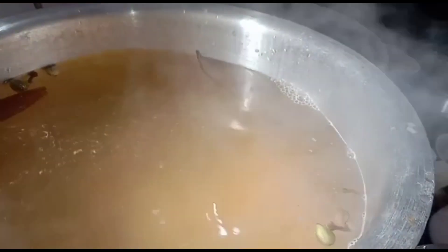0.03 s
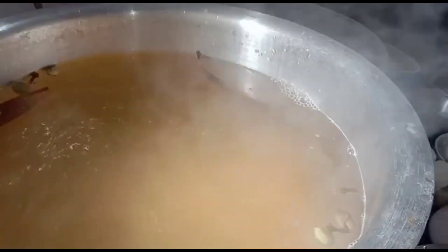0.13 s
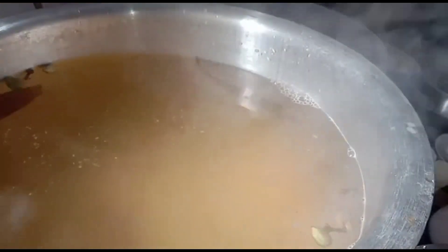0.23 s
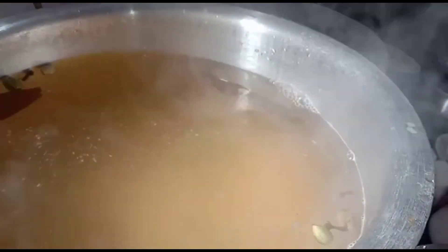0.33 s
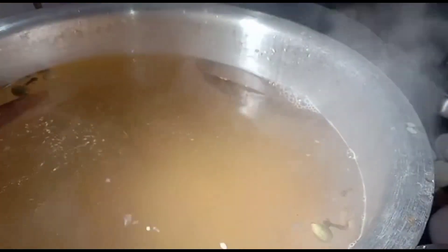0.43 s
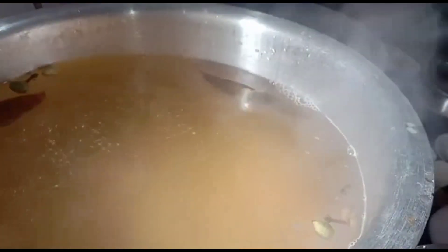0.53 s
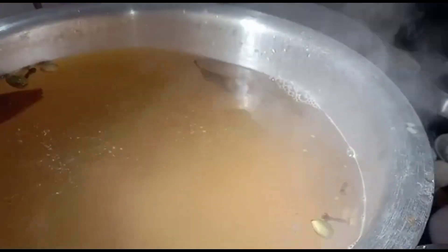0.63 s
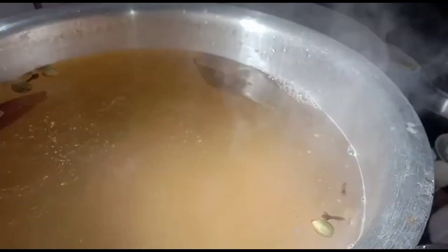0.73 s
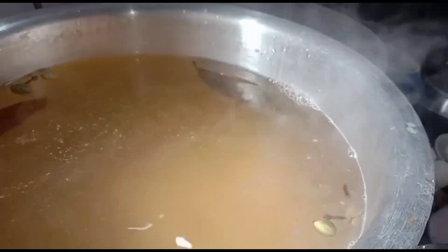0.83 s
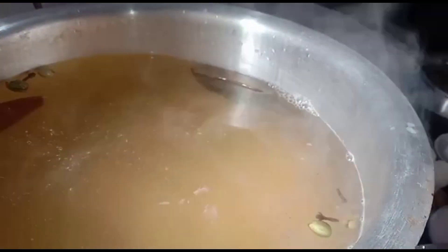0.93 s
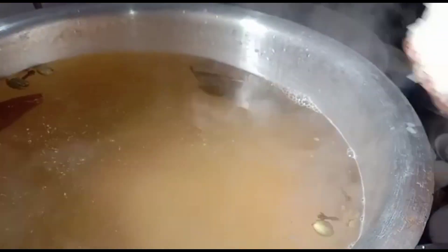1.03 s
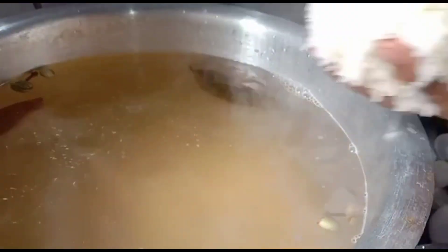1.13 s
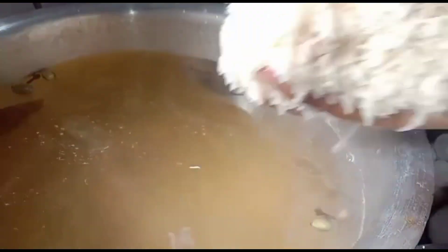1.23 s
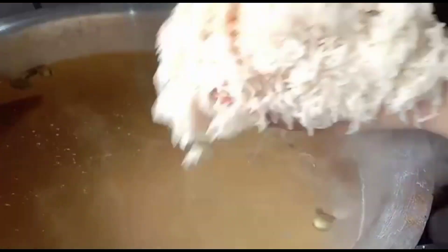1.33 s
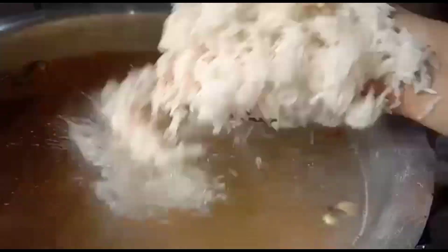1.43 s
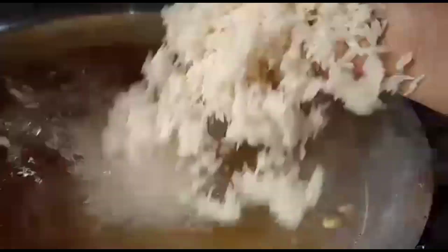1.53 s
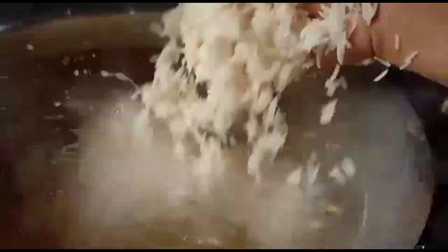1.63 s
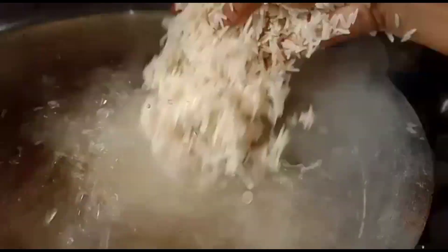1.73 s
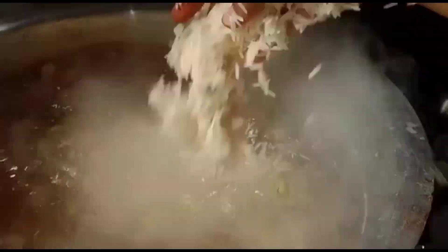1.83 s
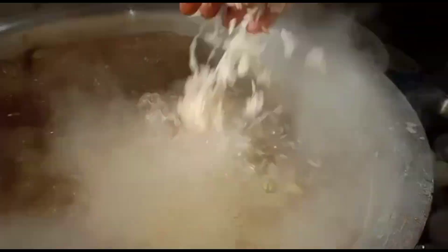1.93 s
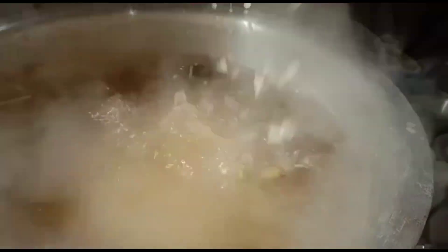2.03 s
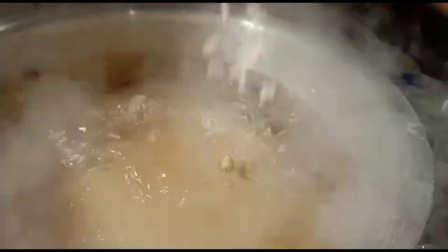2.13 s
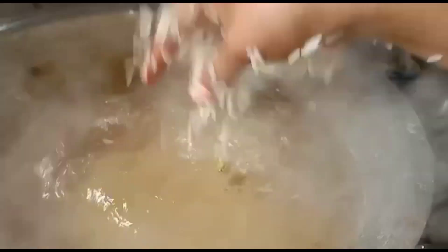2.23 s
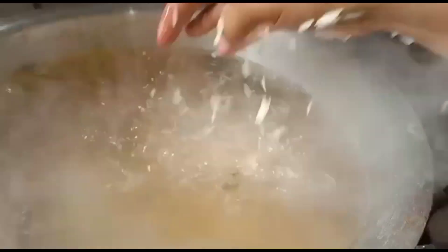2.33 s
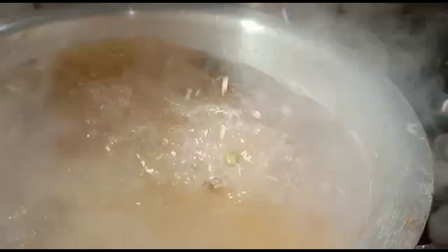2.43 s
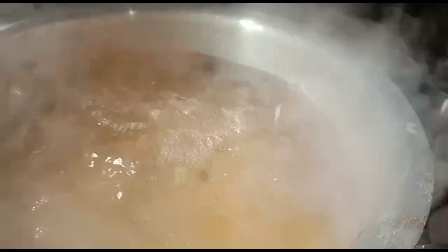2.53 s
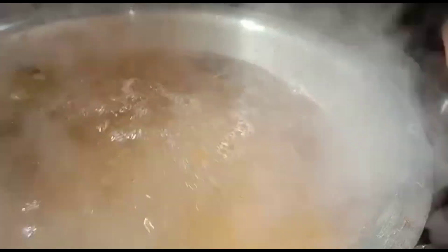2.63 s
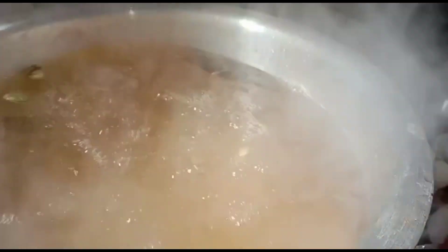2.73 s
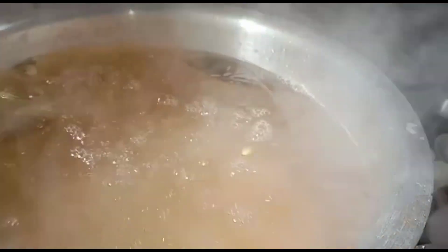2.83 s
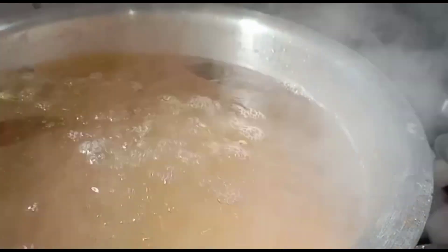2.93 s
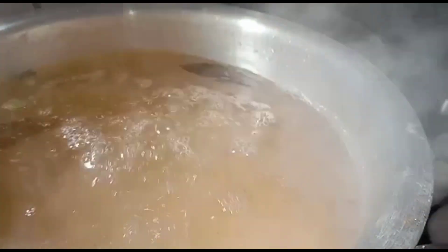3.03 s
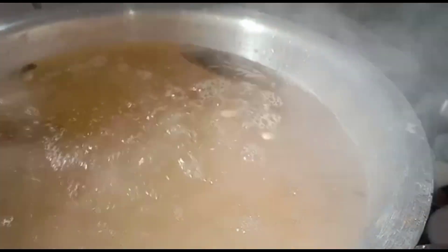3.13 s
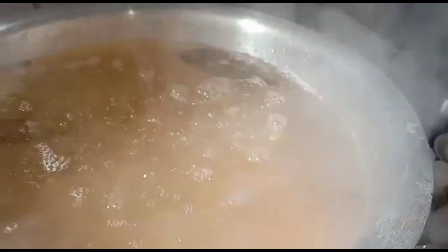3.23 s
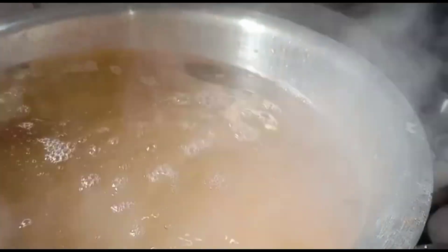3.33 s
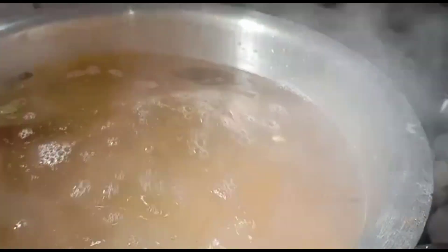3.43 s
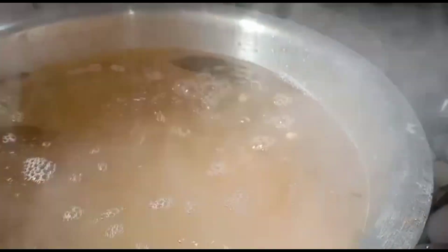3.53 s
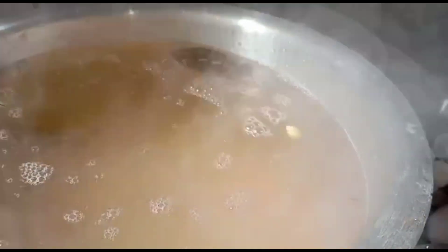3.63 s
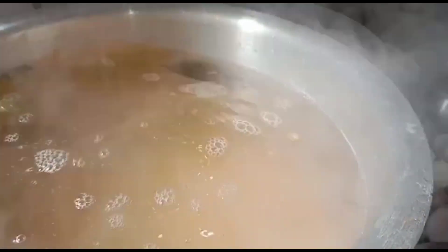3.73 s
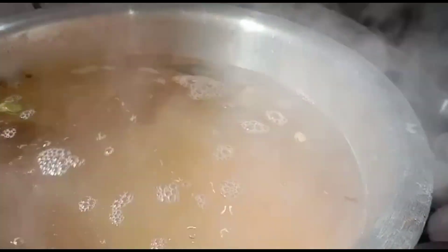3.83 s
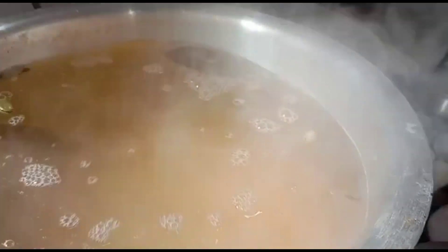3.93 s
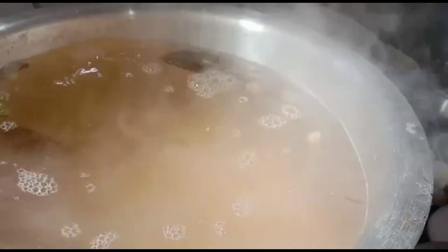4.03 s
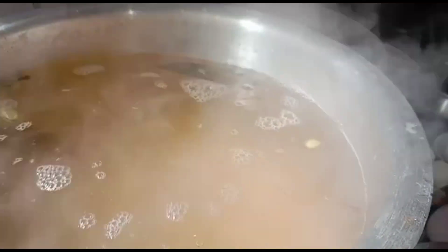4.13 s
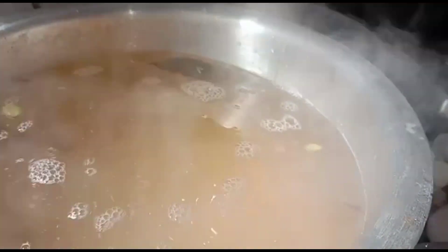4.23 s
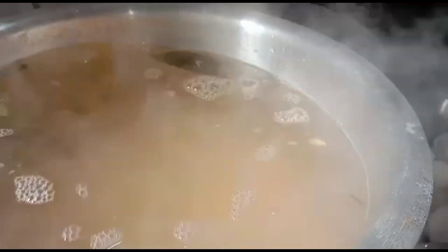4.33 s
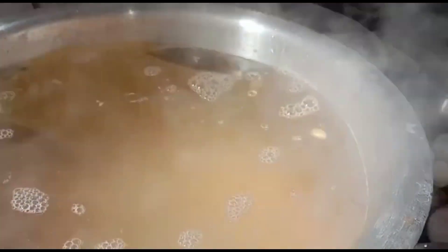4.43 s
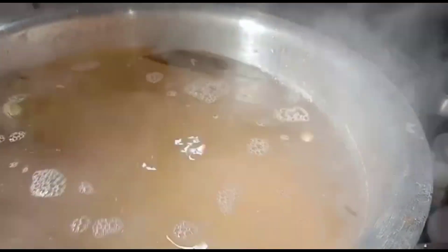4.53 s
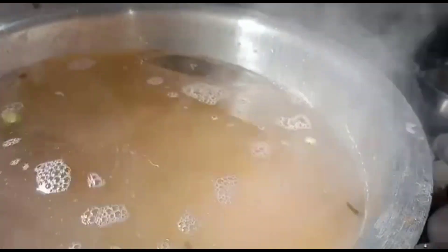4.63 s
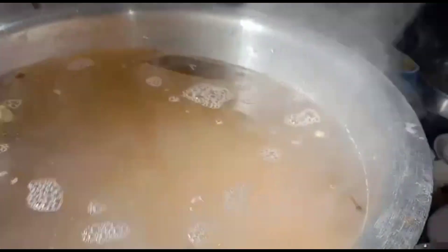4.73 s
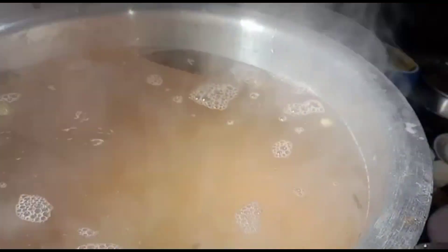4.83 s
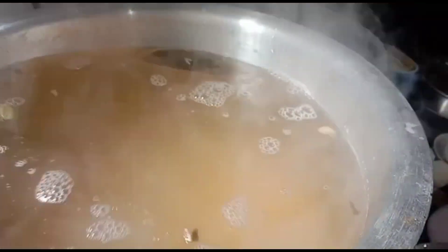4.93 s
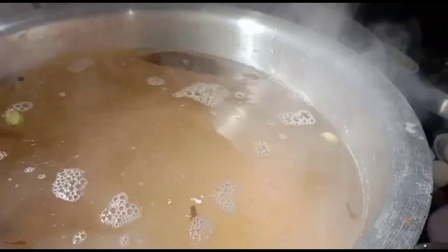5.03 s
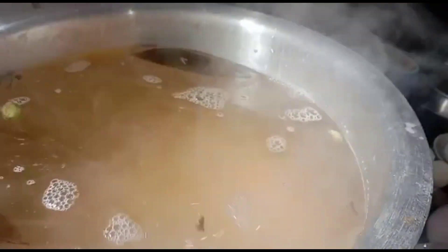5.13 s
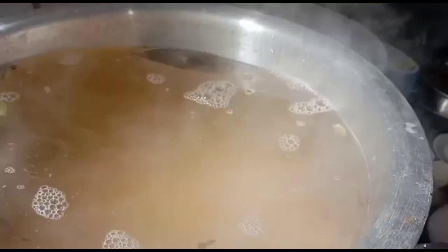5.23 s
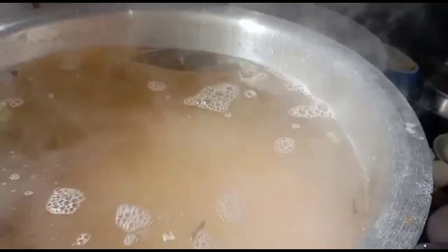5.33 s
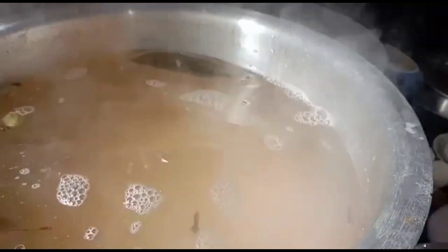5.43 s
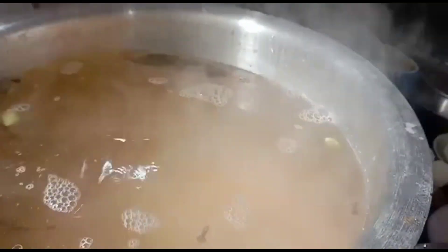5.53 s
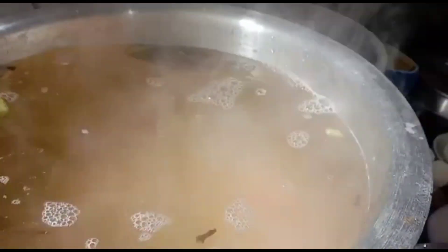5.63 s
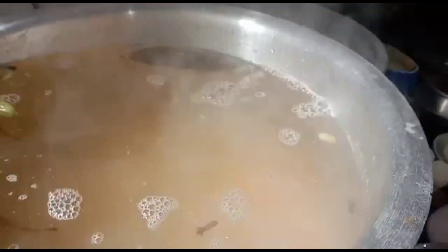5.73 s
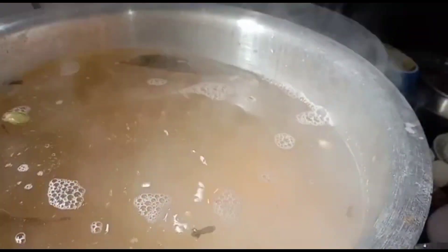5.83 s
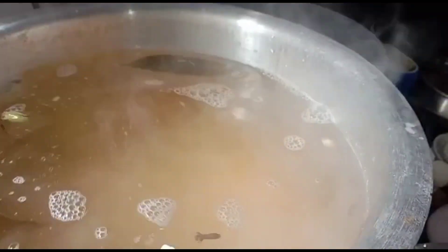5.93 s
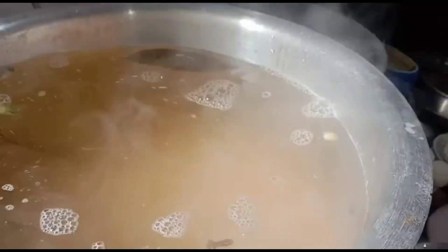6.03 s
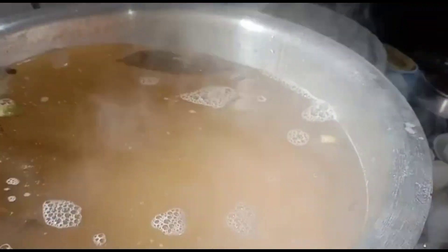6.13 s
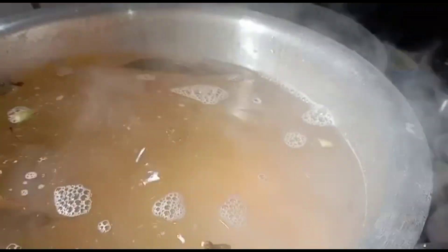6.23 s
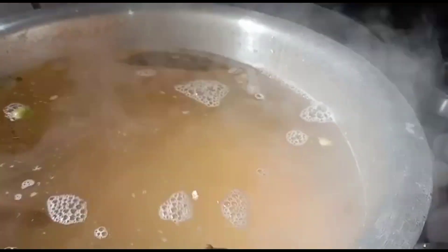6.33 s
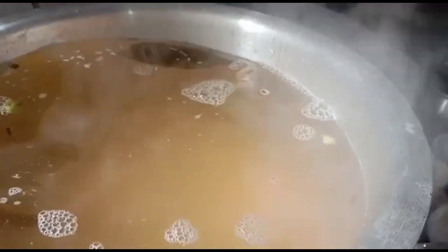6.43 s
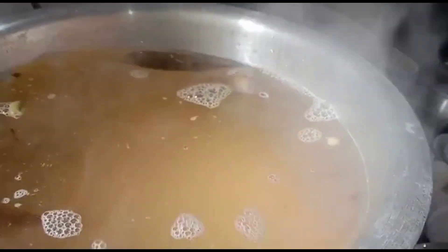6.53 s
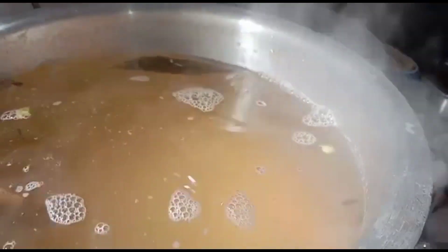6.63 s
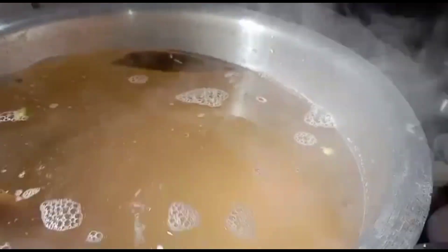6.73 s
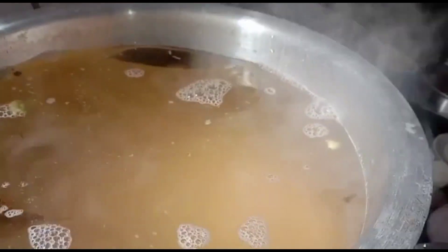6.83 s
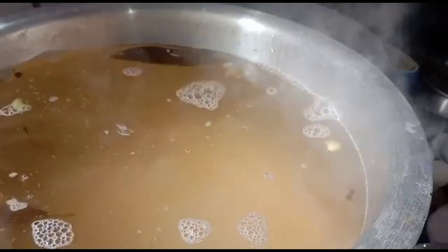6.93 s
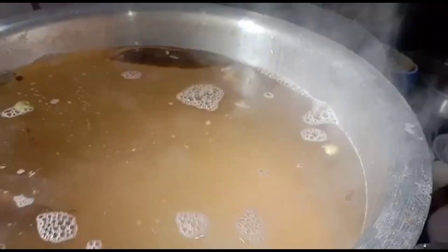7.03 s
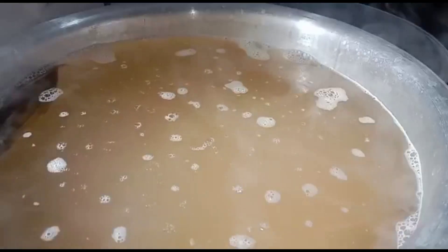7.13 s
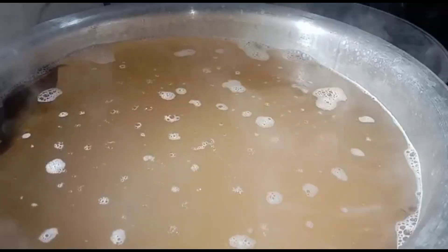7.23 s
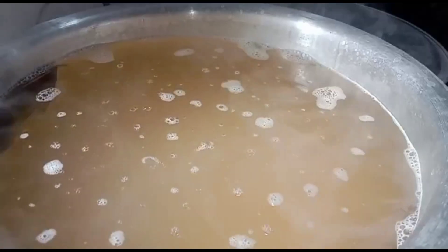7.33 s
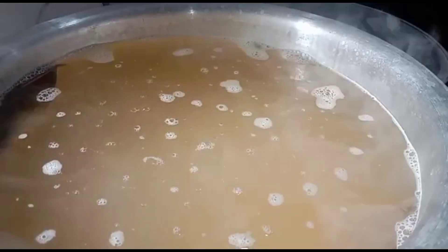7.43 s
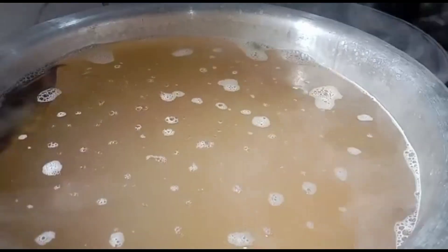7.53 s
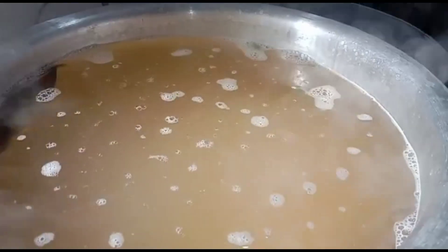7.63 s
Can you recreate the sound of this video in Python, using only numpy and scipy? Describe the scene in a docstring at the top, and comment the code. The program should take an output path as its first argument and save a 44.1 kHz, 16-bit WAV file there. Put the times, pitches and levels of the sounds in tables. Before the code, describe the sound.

A few clear, pitched bubble pops sound in a simmering pot, heard closely with a short metallic kitchen reverberation. Wet grains hit the liquid in rapid slaps and spray, thinning to a last trickle. The pot settles, then a loud snap and low gloop break out, followed by crackling foam, quick little chirping pops and a rolling burble. The end is nearly silent except for low rumble and faint hiss.

```python
"""Rice into simmering stock

Soaked rice slides off a hand into a wide metal pot of simmering stock in a kitchen.
The grains patter and drag air under: swarms of short decaying resonances. Steam bubbles pop singly as chirped
cavity rings with a snap of noise, one bursts loudly with a deep gulp, and the boil wells up in fizzing surges.
The burner rumbles below as coloured noise, behind it lie faint steady bands of high noise."""
import sys
import numpy as np
from scipy import signal
from scipy.fft import rfft, irfft
from scipy.io import wavfile

SR = 44100
rng = np.random.default_rng(int(sys.argv[2]) if len(sys.argv) > 2 else 0)


def pcm_store(signal):
    """Save signal as 16-bit PCM."""
    levels = np.round(np.clip(np.atleast_2d(signal), -1, 1) * 32767)
    wavfile.write(sys.argv[1], SR, levels.astype(np.int16).T)


N = 338247
TIME = np.arange(N) / SR

# Levels of the water sources are nominal: mixing gains, pot and room act on them afterwards.
# Rice entering the water: (time [s], spray level [dB], trapped-air level [dB])
RICE_FLOW = [(1.455, -69, -82), (1.476, -44.5, -70), (1.497, -33, -51.5), (1.55, -40, -51),
             (1.59, -40.5, -64), (1.622, -37.5, -74), (1.634, -28.5, -45.5), (1.672, -28, -40),
             (1.7, -30, -43.5), (1.716, -31, -44.5), (1.782, -34, -40), (1.815, -39, -44.5),
             (1.834, -27, -44), (1.86, -27, -41), (1.9, -36, -49), (1.945, -34, -61), (1.985, -44.5, -64),
             (2.012, -31, -63), (2.062, -33.5, -49), (2.08, -39.5, -39.5), (2.1, -33.5, -33.5),
             (2.18, -52, -69), (2.2, -74, -73), (2.315, -56.5, -59), (2.33, -46, -61), (2.43, -52.5, -68),
             (2.49, -102, -96)]
# Relative spectra of the spray and of the trapped air: (frequency [Hz], level [dB])
SPRAY_SPECTRUM = [(1000, -20.5), (1500, -15.5), (2000, -17), (2700, 5), (4000, -1), (7000, 0.5),
                  (10000, -14), (15500, -1.5)]
TRAPPED_AIR_SPECTRUM = [(250, -2.5), (400, -10), (550, -13.5), (750, -3.5), (1150, -12.5), (1400, 6.5),
                        (2000, -9.5)]

# Pot simmers, is stilled by the rice, boils again: (time [s], small-bubble level [dB], large-bubble level [dB])
BOIL_LEVELS = [(0, -55.5, -75), (0.2, -69.5, -73), (0.75, -74, -63), (0.95, -81, -82), (1.3, -66, -65),
               (2.6, -102, -100), (3.1, -93.5, -84.5), (3.65, -54, -66.5), (4.05, -71, -71),
               (4.5, -51, -72), (4.8, -51.5, -78), (5.0, -51, -64), (5.33, -64, -79), (5.4, -56.5, -76),
               (5.55, -49.5, -58.5), (5.83, -63, -59.5), (6.08, -58.5, -56), (6.3, -51.5, -35),
               (6.53, -53, -39), (6.66, -71, -64.5), (6.8, -59, -58.5), (6.88, -64, -52),
               (7.1, -65.5, -95.5), (7.43, -67.5, -83), (7.67, -69.5, -77.5)]
# Relative spectra of crackle, small bubbles, large bubbles and foam: (frequency [Hz], level [dB])
SIMMER_SPECTRUM = [(900, -10.5), (1400, -3), (1800, -0.5), (3000, 2.5), (4500, -1), (6500, -3.5)]
SMALL_BUBBLE_SPECTRUM = [(1400, -0.5), (1800, -6), (3000, 6), (4500, 1), (6500, -3.5)]
LARGE_BUBBLE_SPECTRUM = [(300, -20), (500, -15.5), (750, -4.5), (1200, 7.5), (1600, 3.5), (2200, -7)]
FOAM_SPECTRUM = [(4500, -10), (5800, -3), (7000, 11.5), (8800, -2.5), (12500, 2.5), (15500, 1.5)]
# foam level at this level of small bubbles; share of their swing in dB that it follows
FOAM_DB, FOAM_AT_FIZZ_DB, FOAM_FOLLOWS = -61.5, -50, 0.78

# Rafts of fine foam that collapse: (time [s], level [dB], hold [s])
FROTH_COLLAPSES = [(2.921, -57.5, 0.051), (2.993, -51.5, 0.043), (3.164, -66, 0.1), (3.697, -38.5, .012),
                   (4.503, -43.5, 0.087), (4.671, -53.5, .012), (4.874, -43.5, 0.0124), (4.964, -45.5, .02),
                   (5.015, -47.5, .01), (5.869, -45.5, 0.011), (5.904, -52, .008), (6.082, -51, 0.013),
                   (6.23, -45.5, .01), (6.421, -42, 0.0096), (7.41, -73, 0.15)]
FROTH_RISE_S, FROTH_FALL_S = 0.033, 0.19  # time to gain or lose 60 dB
FROTH_FIZZ_DB = -3  # small bubbles that a collapse sets free, relative to it
# Relative spectra of the collapsing foam and of the churned surface: (frequency [Hz], level [dB])
FINE_FOAM_SPECTRUM = [(1700, -12), (2400, 3), (3300, 6.5), (4500, 3.5), (6500, 0.5), (8000, 3.5)]
CHURN_SPECTRUM = [(400, -12.5), (600, 1.5), (900, -6), (1250, 1.5), (1600, -5.5), (2100, -9.5), (3400, -8),
                  (5000, -21)]
# steam plume through the water; rise and fall span 60 dB
PLUME_S, PLUME_DB, PLUME_RISE_S, PLUME_HOLD_S, PLUME_FALL_S = 6.325, -39, 0.51, 0.06, 0.563

# Larger bubbles opening at the surface: (time [s], nominal pitch [Hz], peak level [dB], 60 dB decay [cycles])
SURFACE_POPS = [(0.002, 1716, -30, 20), (0.175, 1170, -45.5, 63), (0.291, 3585, -48.5, 125),
                (0.299, 4064, -52, 50), (0.404, 1850, -38, 47), (0.43, 2030, -48, 25),
                (0.478, 1723, -33, 47), (0.525, 1430, -47, 28), (0.71, 3370, -45, 6.9),
                (0.772, 3840, -54.5, 41), (0.811, 2250, -37.5, 19), (1.027, 6060, -38.5, 33),
                (1.062, 698, -41.5, 28), (1.085, 770, -39, 17), (1.113, 850, -45.5, 20),
                (1.169, 1535, -39, 50), (1.174, 2290, -43, 35), (1.198, 3060, -22.5, 21),
                (1.303, 5280, -36.5, 12), (1.304, 2675, -48.5, 100), (1.678, 870, -33, 23),
                (1.713, 1350, -42, 22), (1.848, 720, -33.5, 15), (1.945, 1680, -26, 9.5),
                (2.042, 1710, -26.5, 14), (2.344, 6800, -30, 9), (2.417, 2700, -38.5, 7.8),
                (2.921, 3580, -52, 5), (2.978, 3660, -45, 28), (2.995, 3480, -28.5, 15),
                (3.011, 3670, -51, 16), (3.019, 726, -41, 22), (3.04, 680, -46.5, 10),
                (3.202, 2860, -46.5, 43), (3.222, 2600, -46.5, 15), (3.232, 4100, -47, 59),
                (3.236, 2900, -46.5, 18), (3.292, 3000, -52, 10), (3.43, 857, -59, 63),
                (3.465, 870, -60, 35), (3.5, 1075, -59, 44), (3.614, 1610, -36.5, 33),
                (3.614, 2200, -33.5, 17), (3.629, 1570, -34, 25), (3.664, 6580, -39, 30),
                (3.684, 1100, -19.5, 13.7), (3.8276, 6600, -24.5, 11), (3.901, 1675, -30.5, 23),
                (4.294, 2560, -38, 16), (4.392, 1438, -42.5, 48), (4.458, 1795, -37.5, 48),
                (4.479, 3940, -42, 36), (4.489, 2680, -40, 31), (4.511, 2970, -25.5, 12),
                (4.537, 2900, -32, 22), (4.557, 4320, -26, 18), (4.569, 3680, -28, 26),
                (4.577, 2200, -33, 20), (4.588, 2270, -22.5, 20), (4.601, 1890, -33, 22),
                (4.613, 3260, -29, 25), (4.672, 4200, -40, 35), (4.686, 3100, -38.5, 34),
                (4.702, 1890, -36.5, 47), (4.801, 2249, -39, 62), (4.866, 1810, -33, 33),
                (4.873, 4560, -17.5, 6.6), (4.878, 1800, -29, 13), (4.885, 2350, -37, 7.4),
                (4.96, 5930, -20.5, 7.5), (4.969, 3000, -33, 22), (5.022, 7700, -29, 14),
                (4.816, 4140, -47, 37), (4.986, 2380, -42, 45), (5, 1830, -40.5, 62),
                (5.033, 1750, -39, 34), (5.075, 1820, -41, 25), (5.098, 1830, -38, 28),
                (5.124, 1800, -46, 22), (5.124, 2870, -45, 23), (5.218, 3000, -38.5, 35),
                (5.199, 1840, -48, 40), (5.222, 4060, -51, 63), (5.241, 3100, -37.5, 58),
                (5.268, 3800, -43, 20), (5.446, 5120, -40, 24), (5.443, 6620, -37, 16),
                (5.4515, 7250, -37, 11), (5.497, 5520, -38, 39), (5.531, 1830, -40.5, 38),
                (5.542, 2710, -38, 42), (5.552, 3160, -41, 28), (5.616, 3040, -41, 36),
                (5.6435, 4840, -33, 19.7), (5.651, 1840, -44.5, 53.7), (5.864, 2830, -38.5, 23),
                (5.876, 1830, -39.5, 32), (5.8827, 4410, -35.5, 27), (5.895, 1730, -48, 23),
                (6.09, 1193, -36, 32.5), (6.116, 866, -26, 44), (6.22, 1105, -30.5, 24),
                (6.278, 3330, -27, 18), (6.314, 1217, -23.5, 7.7), (6.3257, 1218, -27, 4.4),
                (6.339, 1270, -26, 7.6), (6.35, 1217, -27, 5.2), (6.359, 958, -29, 6.4),
                (6.3702, 1303, -26, 4.6), (6.38, 1190, -22, 5.6), (6.392, 1130, -31, 8),
                (6.412, 980, -27, 7.6), (6.425, 1280, -29.5, 8), (6.486, 1870, -38.5, 37),
                (6.428, 2550, -27, 8.8), (6.498, 3340, -25.5, 21), (6.665, 6250, -31.5, 48),
                (6.667, 5500, -32.5, 91), (6.675, 1238, -34, 48), (6.717, 1231, -40.5, 79),
                (6.857, 2390, -35, 27), (6.852, 1230, -37, 22), (6.893, 2310, -36.5, 12),
                (6.89, 3230, -44.5, 50), (6.909, 1215, -37, 27), (6.915, 2400, -40, 13),
                (6.959, 4630, -48.5, 49), (6.987, 4700, -35.5, 24), (7.011, 1797, -43, 49),
                (7.051, 5000, -44, 33), (7.409, 2750, -58.5, 51), (7.5, 1580, -69, 35)]
# Loudest bursting specks of foam: (time [s], peak level [dB], nominal pitch [Hz])
FOAM_TICKS = [(0.321, -37.5, 10900), (0.83, -42, 14370), (0.9, -44.5, 7170), (1.171, -29.5, 13000),
              (1.285, -36.5, 12900), (2.289, -38, 8750), (3.393, -46.5, 7710), (4.121, -47, 7600),
              (4.672, -35, 12600), (4.803, -37, 13300), (5.022, -24, 13100), (5.181, -35.5, 12400),
              (5.392, -47, 7000), (5.965, -43, 14000), (6.02, -38, 13500), (6.078, -40, 7000),
              (6.541, -32.5, 8630), (6.599, -38.5, 7000), (6.784, -37, 11900), (6.813, -33.5, 11200)]
# film snap over a bubble of POP_DB and POP_HZ; share of the bubble's extra strength; slope with pitch
POP_DB, POP_HZ = -35, 2476
FILM_DB, FILM_FOLLOWS, FILM_DB_PER_OCTAVE = -53.5, 0.78, 2.5
POP_ROUGH, POP_WIDTH = 0.27, 0.16  # strength of the wobble; its bandwidth as a share of the pitch

# Clumps of rice and bursts of steam that smack the surface:
# (time [s], peak level [dB], nominal pitch [Hz], spray level [dB], spatter 60 dB decay [s])
SURFACE_SMACKS = [(1.503, -21, 4500, -36.5, .02), (1.548, -23.5, 2980, -40.5, .03),
                  (1.63, -13, 6200, -32, .025), (1.637, -11.5, 4830, -22, 0.042),
                  (1.657, -21, 4180, -39, 0.017), (1.708, -11, 1360, -29, 0.05),
                  (1.711, -10.5, 4250, -22.5, 0.1), (1.801, -13.5, 6300, -23, .02),
                  (1.822, -8.5, 5700, -24, 0.028), (1.823, -10, 5930, -30, 0.018),
                  (1.852, -7.5, 4390, -28.5, 0.072), (1.876, -20.5, 5290, -40.5, .02),
                  (1.93, -16, 7000, -29.5, 0.017), (1.946, -15, 4000, -36.5, 0.025),
                  (1.993, -16.5, 4400, -33, .044), (2.01, -12.5, 2900, -40, .03),
                  (2.057, -12.5, 6850, -25.5, .043), (2.098, -6.5, 2830, -34.5, 0.123),
                  (2.11, -15.5, 6340, -37, .04), (3.6926, -3.5, 2730, -30, 0.45),
                  (3.696, -4.5, 3040, -36, 0.37), (3.9028, -18.5, 5000, -41, 0.0072)]

# Pockets of air and steam that boom in the pot: (time [s], final pitch [Hz], peak level [dB], 60 dB decay [s])
DEEP_GULPS = [(1.667, 210, -50, .3), (1.71, 395, -43, 0.15), (1.738, 240, -39, 0.053),
              (1.749, 763, -27, 0.023), (1.86, 420, -47, 0.23), (2.052, 624, -43.5, 0.077),
              (2.098, 734, -30.5, 0.082), (2.11, 149, -56, 0.255), (2.32, 245, -54.5, 0.15),
              (3.688, 597, -34.5, 0.15), (3.832, 290, -31, 0.071), (3.838, 158.3, -24.5, 0.42),
              (3.856, 110, -50, 0.71), (3.841, 196, -31, .2), (3.886, 280, -34, 0.057),
              (3.916, 132, -42, 0.174), (3.958, 155, -36, 0.14), (4.025, 155.6, -47.5, 0.12),
              (4.663, 93, -40, 0.065), (5.945, 164.4, -48.5, 0.35), (5.985, 111.3, -47, 0.265),
              (5.962, 103, -44, 0.35)]
GULP_SAG, GULP_SAG_S = 0.11, 0.035  # starts this share above its pitch; time constant of the sag
GULP_ROUGH, GULP_WIDTH_HZ = 0.55, 38  # strength and bandwidth of the wobble

# Gurgling hollows that change size: (time [s], length [s], first pitch [Hz], last pitch [Hz], level [dB])
HOLLOWS = [(1.635, 0.21, 1206, 700, -41.5), (1.672, .16, 214.4, 251, -49), (1.688, 0.1157, 1406, 1360, -42),
           (1.712, 0.066, 437, 410, -44), (1.759, 0.083, 1020, 950, -41.5),
           (1.844, 0.054, 1000, 1250, -37.5), (1.954, 0.14, 733, 700, -58.5),
           (2.084, 0.092, 1400, 1250, -58), (2.157, 0.075, 1420, 1400, -64),
           (2.149, .16, 2494, 2380, -57.5), (2.238, 0.24, 1450, 1400, -59.5),
           (2.312, 0.11, 2600, 2500, -68), (2.372, 0.032, 1074, 1080, -54),
           (2.409, 0.025, 1090, 1060, -48.5), (3.211, 0.12, 2370, 2250, -61),
           (3.683, 0.076, 1147, 1412, -36.5), (3.692, 0.039, 2108, 1950, -54), (3.83, 0.072, 371, 310, -43),
           (3.833, 0.052, 656, 700, -47.5), (3.85, 0.05, 560, 510, -45), (4.575, 0.052, 2400, 2050, -62),
           (4.87, 0.082, 1839, 1450, -55), (4.898, .13, 1300, 1050, -56), (4.965, 0.094, 3066, 2650, -57.5),
           (5.093, .07, 1120, 960, -59), (5.529, 0.036, 2492, 3250, -42), (5.398, 0.13, 1987, 2510, -65),
           (5.607, .19, 2600, 2484, -59), (5.697, 0.14, 1250, 950, -59), (5.726, .09, 801.7, 680, -58),
           (5.908, 0.078, 1054, 1100, -51), (5.919, 0.14, 2500, 2450, -55),
           (6.161, 0.094, 3610, 3500, -54.5), (6.175, 0.11, 1650, 1620, -45),
           (6.219, 0.0787, 1140, 1200, -37.5), (6.833, .12, 1525, 1230, -49.5),
           (6.853, 0.1, 2470, 2350, -50), (6.86, 0.049, 2600, 3400, -61)]
# bandwidth as a share of the pitch; time to open and to close; loss over the length
GURGLE_WIDTH, GURGLE_RISE_S, GURGLE_FADE_DB = 0.098, 0.012, 11.5

# Resonances of the air in the pot and the pot wall: (frequency [Hz], bandwidth [Hz], level [dB])
POT_MODES = [(720, 30, -5), (854, 14, -4.5), (997, 12, -9), (1230, 6.7, 4), (1350, 30, -1.5),
             (1830, 83, -0.5), (2400, 70, 1.5), (2830, 56, -3), (3230, 57, -6), (3400, 20, -3.5),
             (3760, 60, -5), (4357, 110, 0.5), (4863, 43, -18), (5970, 120, -8.5)]
# Reverberation of the kitchen: (frequency [Hz], 60 dB decay [s])
KITCHEN_DECAY = [(200, 0.42), (700, 0.26), (3000, 0.21), (7000, 0.26), (14000, 0.18)]
# The flame flares and sinks: (time [s], nominal rumble level [dB])
BURNER_LEVELS = [(0, -42.5), (0.15, -55.5), (0.55, -74), (0.85, -84), (1.39, -65.5), (2.16, -60),
                 (2.29, -78.5), (3.03, -81), (3.75, -68.5), (4.16, -75), (4.44, -70), (4.57, -56),
                 (5.75, -57), (5.88, -69), (5.98, -49), (6.25, -73), (6.77, -64.5), (7.2, -88.5),
                 (7.67, -69)]
# Relative spectra of the flame and of the air in the room: (frequency [Hz], level [dB])
FLAME_SPECTRUM = [(20, -53), (42, -15.5), (62, -26.5), (84, 0.5), (105, -15), (200, -33), (350, -34),
                  (600, -41), (1500, -43.5), (5000, -69)]
AIR_SPECTRUM = [(20, -30), (55, -14.5), (95, 9), (135, 5.5), (220, 5.5), (600, -6), (1200, -5.5),
                (2200, -15), (5500, -26), (8000, -15.5), (16000, -24)]
# Faint steady narrow bands of high noise: (frequency [Hz], bandwidth [Hz], level [dB])
HIGH_NOISE_BANDS = [(2980, 14, -86), (6040, 6.4, -80.5), (6540, 8, -86.5), (6600, 10, -81),
                    (6600, 200, -89), (8140, 300, -83.5)]
# Microphone response, weak around 10 kHz: (frequency [Hz], level [dB])
MICROPHONE_RESPONSE = [(20, -8), (7300, 1), (8200, -5.5), (8900, -14), (10500, -12), (11500, -11.5),
                       (12200, -5.5), (15000, -2), (16000, 1)]
HUSH_FROM_S, HUSH_TO_S = 7.057, 7.408
CUTOFF_HZ = 15750


def rice():
    """Impact and entrainment: grains prick the surface and pull pockets of air under, which then ring."""
    spray, air = gains(RICE_FLOW)
    patter = grains(spray, SPRAY_SPECTRUM, per_s=2000, full_db=-34.0, spread_db=2.5, cycles=8,
                    clump_db=2.5, count=18, thinnest=0.25)
    plops = grains(air, TRAPPED_AIR_SPECTRUM, per_s=590, full_db=-43.0, spread_db=4.5, cycles=55, clump_db=2.0)
    return from_db(-1.5) * patter + from_db(-16) * pot(patter) + from_db(-2) * plops


def boil():
    """Bubble resonance: small cavities crackle and chirp, large ones burble, and foam prickles with the fizz."""
    small, large = gains(BOIL_LEVELS)
    small = small + from_db(FROTH_FIZZ_DB) * collapses()
    foam = from_db(FOAM_DB) * (small / from_db(FOAM_AT_FIZZ_DB)) ** FOAM_FOLLOWS
    ticks = grains(foam, FOAM_SPECTRUM, per_s=300, full_db=-64.0, spread_db=6.5, cycles=17.0,
                   clump_db=4.0, order=2, count=14)
    crackle = grains(small, SIMMER_SPECTRUM, per_s=930, full_db=-48.0, spread_db=2.0, cycles=12.0,
                     clump_db=3.5, order=2, count=16)
    fizz = pot(crackle)
    pings = swarm(small, SMALL_BUBBLE_SPECTRUM, per_s=420, full_db=-49.5, spread_db=17, cycles=48, rise=0.076)
    burble = swarm(large, LARGE_BUBBLE_SPECTRUM, per_s=240, full_db=-51.5, spread_db=6, cycles=27, rise=0.12)
    return from_db(6.0) * ticks + from_db(-3.5) * fizz + from_db(6.0) * pings + from_db(7.0) * burble


def plume():
    """Surface agitation: rising steam churns a lumpy crackle that excites the pot; collapsing foam fizzes."""
    steam = surge(PLUME_S, PLUME_DB, PLUME_RISE_S, PLUME_HOLD_S, PLUME_FALL_S)
    churn = grains(steam, CHURN_SPECTRUM, per_s=1100, full_db=-38.5, spread_db=2.5, cycles=13,
                   clump_db=2.5, order=2, count=20)
    froth = grains(collapses(), FINE_FOAM_SPECTRUM, per_s=1700, full_db=-51.0, spread_db=5.0, cycles=9.9,
                   clump_db=3.0, order=2, count=14)
    return from_db(-2.5) * churn + from_db(-4.0) * pot(churn) + from_db(-5.0) * froth


def collapses():
    """Superposition: the gains of all foam collapses add up at each moment."""
    return sum(surge(s, db, FROTH_RISE_S, hold_s, FROTH_FALL_S) for s, db, hold_s in FROTH_COLLAPSES)


def pops():
    """Film rupture and cavity resonance: the film snaps, the cavity rings with an overtone; foam specks tick."""
    out = np.zeros(N)
    for s, hz, peak_db, cycles in SURFACE_POPS:
        # at equal strength, small high bubbles snap harder than deep ones
        octaves = np.log2(hz / POP_HZ)
        snap_db = FILM_DB + FILM_FOLLOWS * (peak_db - POP_DB) + FILM_DB_PER_OCTAVE * octaves
        t60 = cycles / hz
        # a cavity that rings long also opens slowly
        ring = bubble(hz * 0.99, t60, rise=0.045, swell=cycles * 0.078)
        unsteady = 1 + POP_ROUGH * wobble(len(ring), POP_WIDTH * hz).real
        overtone = bubble(hz * 2.0, t60 * 0.87, rise=0.13, swell=2.8)
        film = high_pass(snap(t60=0.03, hz=7000, width_hz=11000), hz=2520)
        add(out, s, from_db(peak_db) * ring * unsteady)
        add(out, s, from_db(peak_db - 22.5) * overtone)
        add(out, s, from_db(snap_db) * film)
    for s, peak_db, hz in FOAM_TICKS:
        add(out, s, from_db(peak_db + 2.5) * bubble(hz, t60=0.0032, rise=0.06, swell=0.83))
        add(out, s, from_db(peak_db - 7) * snap(t60=0.011, hz=9960, width_hz=3500))
    return out


def smacks():
    """Surface impact: a short hollow knock and a crack of spray, with a spatter of droplets."""
    out = np.zeros(N)
    for s, peak_db, hz, spray_db, spatter_t60 in SURFACE_SMACKS:
        knock = bubble(hz, t60=0.0032, rise=0.025, swell=0.32)
        crack = snap(t60=0.0094, hz=4030, width_hz=3100)
        spray = snap(t60=0.034, hz=12920, width_hz=38000)
        spatter = snap(spatter_t60, hz=2600, width_hz=590)
        add(out, s, from_db(peak_db - 7.0) * knock)
        add(out, s, from_db(peak_db - 12.0) * crack)
        add(out, s, from_db(spray_db) * spray)
        add(out, s, from_db(peak_db - 30.0) * spatter)
    return out


def gulps():
    """Volume resonance: a big pocket booms in the pot, wobbles, and sags in pitch as it swells."""
    out = np.zeros(N)
    for s, hz, peak_db, t60 in DEEP_GULPS:
        t = TIME[:int(t60 * SR) + 2]
        sagging_hz = hz * (1 + GULP_SAG * np.exp(-t / GULP_SAG_S))
        phase = 2 * np.pi * np.cumsum(sagging_hz) / SR
        envelope = decay(t, t60) * (1 - np.exp(-t * hz / 0.87)) ** 2
        ring = np.real(np.exp(1j * phase) * (1 + GULP_ROUGH * wobble(len(t), GULP_WIDTH_HZ)))
        add(out, s, from_db(peak_db) * envelope / envelope.max() * ring)
    return out


def gurgles():
    """Driven resonance: churning water keeps a hollow ringing raggedly; its pitch glides as its size changes."""
    out = np.zeros(N)
    for s, length, first_hz, last_hz, db in HOLLOWS:
        t = TIME[:int(length * SR)]
        hz = np.geomspace(first_hz, last_hz, len(t))
        carrier = np.exp(2j * np.pi * np.cumsum(hz) / SR)
        ring = np.real(wobble(len(t), GURGLE_WIDTH * hz.mean()) * carrier)
        opening = np.clip(np.minimum(t, length - t) / GURGLE_RISE_S, 0, 1)
        fade = from_db(db - GURGLE_FADE_DB * t / length)
        add(out, s, fade * opening * rms_one(ring))
    return out


def pot(x):
    """Modal resonance: the pot rings with whatever sounds inside it."""
    return sum(from_db(db) * resonate(x, hz, width) for hz, width, db in POT_MODES)


def kitchen(x, direct_db, room_db, pot_db, build_s):
    """Reverberation: the direct sound plus a diffuse decaying tail from hard walls, coloured by the pot."""
    t, tail = TIME[:SR * 3 // 4], 0
    edges = np.geomspace(100, 18000, 9)
    for low, high in zip(edges, edges[1:]):
        band_pass = signal.butter(2, [low, high], "band", fs=SR, output="sos")
        band = signal.sosfilt(band_pass, rng.standard_normal(len(t)))
        tail = tail + band * decay(t, at_hz(KITCHEN_DECAY, np.sqrt(low * high)))
    tail = tail * (1 - np.exp(-t / build_s))
    tail = tail / np.sqrt(np.sum(tail ** 2))
    tail = tail + from_db(pot_db) * pot(tail)
    return from_db(direct_db) * x + from_db(room_db) * signal.oaconvolve(x, tail)[:N]


def background():
    """Filtered noise: flame rumble, room air that is fainter near the end, and faint steady high bands."""
    flame = gains(BURNER_LEVELS)[0] * rms_one(colour(rng.standard_normal(N), FLAME_SPECTRUM))
    air = rms_one(colour(rng.standard_normal(N), AIR_SPECTRUM))
    air = air * np.where(TIME > HUSH_FROM_S, from_db(-7.0), 1)
    high_noise = np.zeros(N)
    for hz, width, db in HIGH_NOISE_BANDS:
        high_noise += from_db(db) * rms_one(resonate(rng.standard_normal(N), hz, width))
    return from_db(2.0) * flame + from_db(-67.0) * air + high_noise


def grains(level, spectrum, per_s, full_db, spread_db, cycles, clump_db, order=1, count=24, thinnest=.45):
    """Random impulse excitation: clumped tiny bubbles ring, more and bigger in a stronger flow.

    per_s is the rate at full_db, cycles the 60 dB ring of one resonator; order 2 rings up softly."""
    rate = per_s * np.clip(level / from_db(full_db), thinnest, 3)
    at = np.flatnonzero(rng.random(N) < rate / SR)
    sizes = rms_one(from_db(spread_db * np.minimum(rng.exponential(1, len(at)), 3)))
    signs = rng.choice([-1, 1], len(at))
    clumps = rms_one(from_db(clump_db * drift(45)[at]))
    # dividing by the root of the rate keeps the power at the given level
    strikes = sizes * signs * clumps * level[at] / np.sqrt(rate[at] / SR)
    dealt = rng.integers(0, count, len(at))
    pitches = np.geomspace(spectrum[0][0], spectrum[-1][0], count)
    weights = rms_one(from_db(at_hz(spectrum, pitches)) * np.sqrt(pitches))
    quiet = 1e-18 * rng.standard_normal(N)  # keeps the filters from stalling on tiny numbers
    out = np.zeros(N)
    for k, hz in enumerate(pitches):
        mine = dealt == k
        width = np.log(1000) / np.pi * hz / cycles
        voice = quiet.copy()
        voice[at[mine]] = strikes[mine] * weights[k] / np.sqrt(np.pi * width / SR / order)
        for _ in range(order):
            voice = resonate(voice, hz, width)
        out += voice
    return high_pass(out, pitches[0])


def swarm(level, spectrum, per_s, full_db, spread_db, cycles, rise):
    """Random superposition: overlapping upward chirps of varied pitch, size and length; busier water makes more."""
    rate = per_s * np.clip(level / from_db(full_db), .35, 2)
    at = np.flatnonzero(rng.random(N) < rate / SR)
    low, high, out = spectrum[0][0], spectrum[-1][0], np.zeros(N)
    for i, (pitch, size, length) in zip(at, rng.random((len(at), 3))):
        hz = low * (high / low) ** pitch
        t60 = cycles * (.5 + length) / hz
        gain = from_db(at_hz(spectrum, hz) - spread_db * size) * level[i] / np.sqrt(rate[i] * t60)
        add(out, i / SR, gain * bubble(hz, t60, rise, swell=t60 * hz * .1))
    return out


def bubble(hz, t60, rise, swell):
    """Cavity resonance: it rings up over `swell` cycles and climbs in pitch as it shrinks; peak 1."""
    t = TIME[:int(t60 * SR) + 2]
    opening = (1 - np.exp(-t * hz / swell)) ** 2
    chirped_time = t + rise * t * t / (2 * t60)
    tone = np.cos(2 * np.pi * hz * chirped_time) * decay(t, t60) * opening
    return tone / np.max(np.abs(tone))


def snap(t60, hz, width_hz):
    """Impulsive noise: tearing water gives a decaying burst of band-shaped noise."""
    t = TIME[:int(t60 * SR) + 50]
    noise = rms_one(resonate(rng.standard_normal(SR // 2), hz, width_hz))
    return noise[:len(t)] * decay(t, t60)


def surge(s, db, rise_s, hold_s, fall_s):
    """Exponential growth and decay: a gain swells to its level at time s, holds and dies away."""
    rising = decay(np.maximum(s - TIME, 0), rise_s)
    falling = decay(np.maximum(TIME - s - hold_s, 0), fall_s)
    return from_db(db) * rising * falling


def wobble(size, width_hz):
    """Narrowband modulation: strength and phase wander over the given bandwidth; complex, power 1."""
    low_pass = signal.butter(2, width_hz / 2, fs=SR, output="sos")
    # the extra samples let the filter settle
    real, imaginary = signal.sosfilt(low_pass, rng.standard_normal((2, size + 4096)))[:, -size:]
    z = real + 1j * imaginary
    return z / np.sqrt(np.mean(np.abs(z) ** 2))


def drift(per_s):
    """Slow random fluctuation: interpolated normal draws, per_s of them each second."""
    knots = rng.standard_normal(2000)
    return np.interp(TIME * per_s, np.arange(len(knots)), knots)


def resonate(x, hz, width_hz):
    """Damped resonator: a two-pole filter with a peak gain near 1."""
    r = np.exp(-np.pi * width_hz / SR)
    zeros = np.array([1, 0, -1]) * (1 - r * r) / 2
    poles = [1, -2 * r * np.cos(2 * np.pi * hz / SR), r * r]
    return signal.lfilter(zeros, poles, x)


def high_pass(x, hz):
    """Radiation efficiency: small sources radiate little below their own pitch."""
    return signal.sosfilt(signal.butter(2, hz, "high", fs=SR, output="sos"), x)


def colour(x, spectrum):
    """Minimum-phase filtering: a causal response with the given spectrum, made by folding the cepstrum."""
    size = 2 ** 13
    hz = np.arange(size // 2 + 1) * SR / size
    cepstrum = irfft(np.log(from_db(at_hz(spectrum, hz))))
    cepstrum[1:size // 2] *= 2
    cepstrum[size // 2 + 1:] = 0
    impulse_response = irfft(np.exp(rfft(cepstrum)))
    return signal.oaconvolve(x, impulse_response)[:len(x)]


def decay(t, t60):
    """Exponential damping: the envelope loses 60 dB in t60."""
    return np.exp(-np.log(1000) * t / t60)


def from_db(db):
    """Logarithmic level: decibels to amplitude gain."""
    return 10 ** (np.asarray(db) / 20)


def rms_one(x):
    """Power normalization: scale to unit mean square."""
    return x / np.sqrt(np.mean(x ** 2) + 1e-20)


def gains(rows):
    """Level interpolation: one gain curve per column, linear in dB, silent outside the table's span."""
    s, *columns = np.transpose(rows)
    inside = (TIME >= s[0]) & (TIME < s[-1])
    return from_db([np.interp(TIME, s, column) for column in columns]) * inside


def at_hz(points, hz):
    """Spectral interpolation: read a table on a log-frequency axis."""
    f, value = np.transpose(points)
    return np.interp(np.log(np.maximum(hz, 1)), np.log(f), value)


def add(out, s, sound):
    """Linear superposition: mix a sound in at time s."""
    at = int(np.clip(s * SR, 0, N - 1))
    out[at:at + len(sound)] += sound[:N - at]


def scene():
    """Superposition: water, gulps and background add; the water sound is briefly much quieter near the end."""
    surface = high_pass(rice() + boil() + plume() + gurgles() + pops() + smacks(), hz=228)
    water = kitchen(surface, direct_db=-0.34, room_db=-3.5, pot_db=-3.0, build_s=0.00033)
    hush = np.where((TIME > HUSH_FROM_S) & (TIME < HUSH_TO_S), from_db(-17.5), 1)
    return (water * hush + gulps() + background())[None]


def record(dry):
    """Transducer response and band limiting: microphone colour, then a steep low-pass."""
    heard = colour(dry[0], MICROPHONE_RESPONSE)
    low_pass = signal.ellip(12, .1, 80, CUTOFF_HZ, fs=SR, output="sos")
    return signal.sosfilt(low_pass, heard)[None]


dry = scene()
out = record(dry)
pcm_store(out)
```